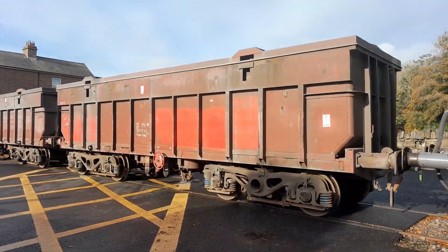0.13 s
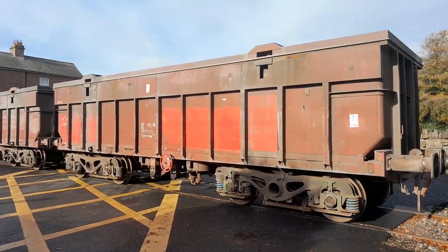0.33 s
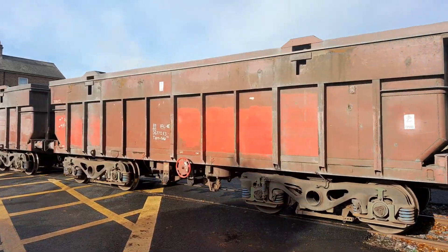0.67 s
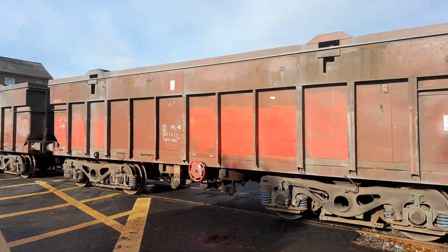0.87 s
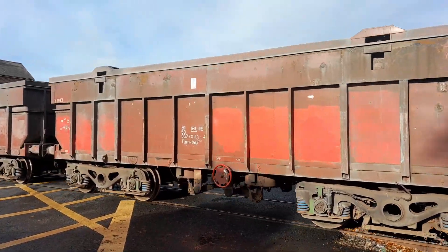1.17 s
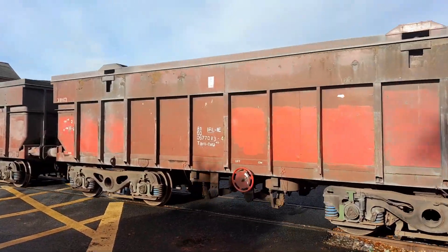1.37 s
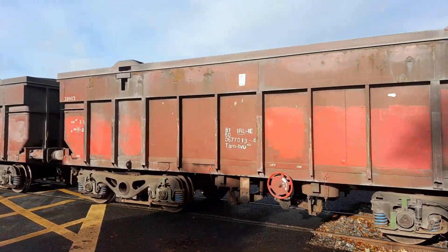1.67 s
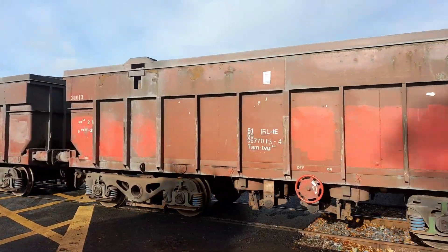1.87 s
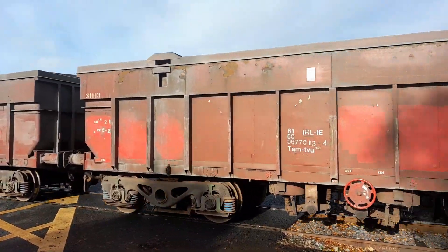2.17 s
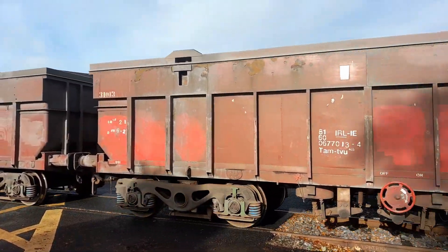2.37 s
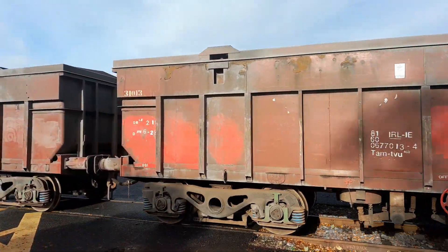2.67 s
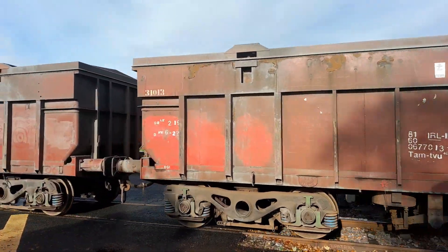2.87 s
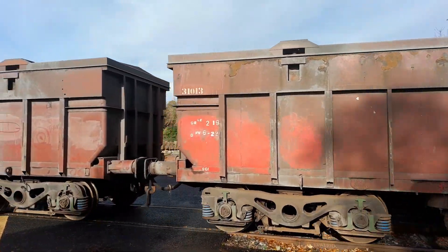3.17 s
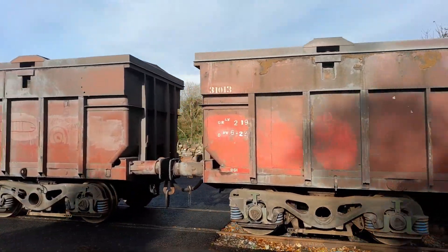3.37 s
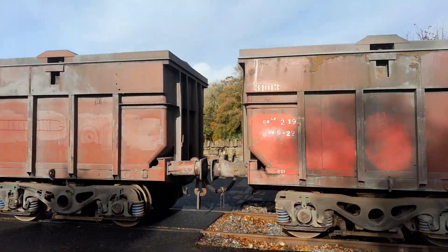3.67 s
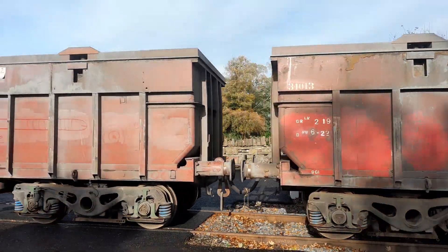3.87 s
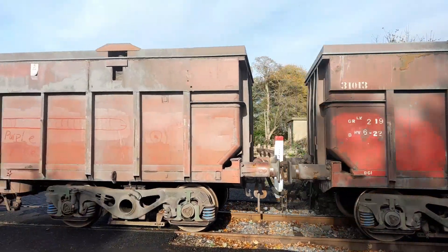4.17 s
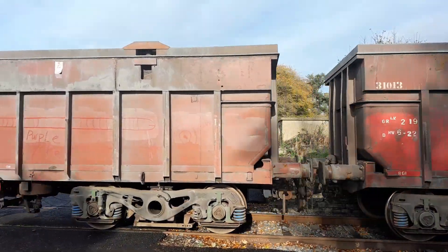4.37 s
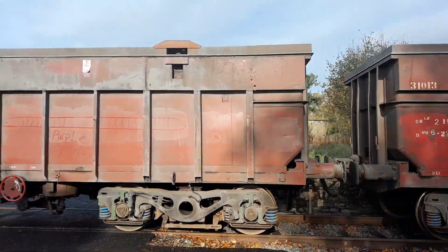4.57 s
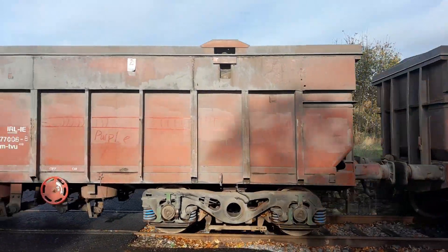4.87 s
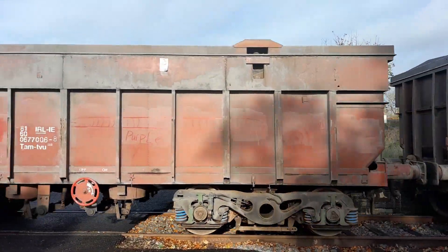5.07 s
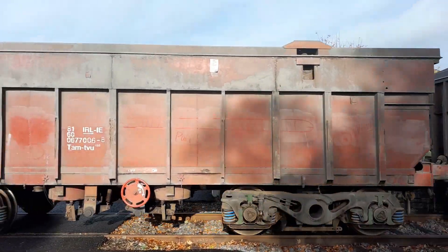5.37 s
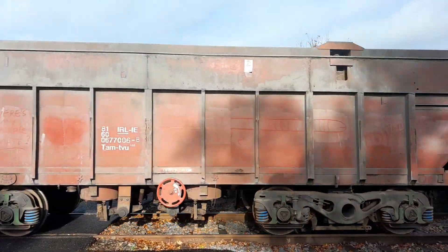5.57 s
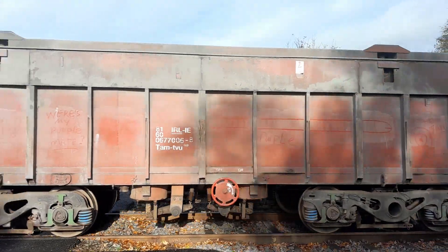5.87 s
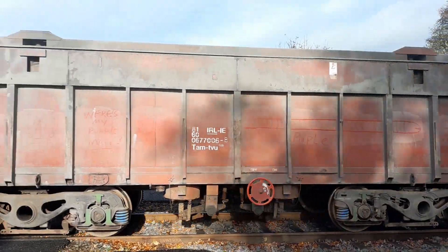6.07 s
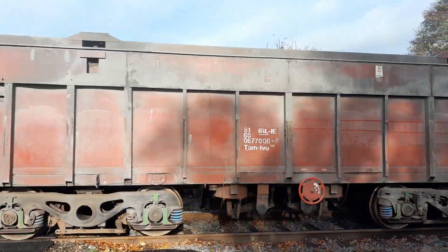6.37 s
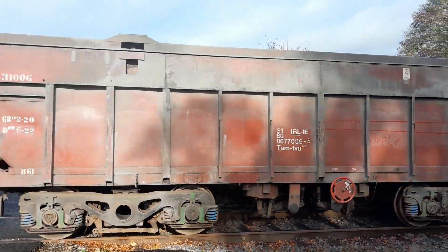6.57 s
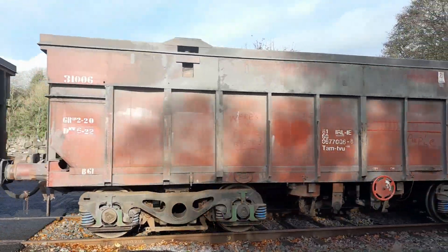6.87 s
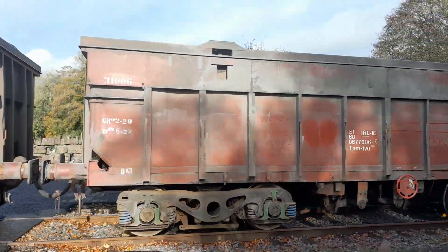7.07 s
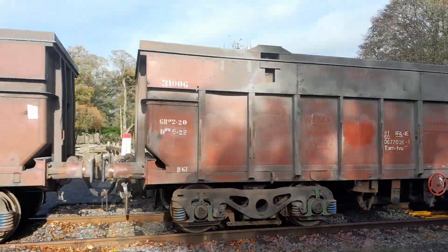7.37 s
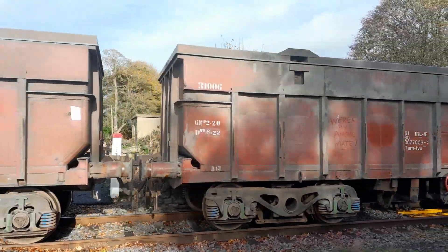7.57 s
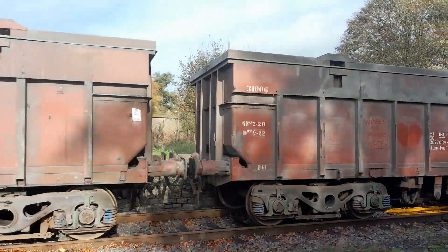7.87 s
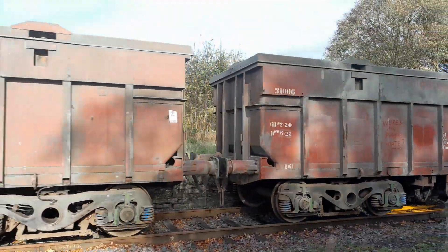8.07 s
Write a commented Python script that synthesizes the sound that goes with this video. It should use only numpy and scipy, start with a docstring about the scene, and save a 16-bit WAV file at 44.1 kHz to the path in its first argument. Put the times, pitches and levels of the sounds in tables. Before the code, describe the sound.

A loud diesel locomotive drones away to the right, easing off its revs, as freight wagons rumble past and wind buffets the microphone.

```python
"""Diesel locomotive easing off

Gusts flutter (gated low noise) and pop (single pressure swings) on two microphone ports. Wagons roll by as
coloured noise, with brake scrapes and flange squeaks. The locomotive recedes to the right: exhaust and gear
tones follow one crankshaft angle that falls and hunts, over casing roar, turbocharger whistle and intake rush."""
import sys
import numpy as np
from scipy.fft import rfft, irfft, next_fast_len
from scipy.io import wavfile
from scipy.ndimage import map_coordinates

SR = 44100
rng = np.random.default_rng(int(sys.argv[2]) if len(sys.argv) > 2 else 0)


def to_wav(s):
    """Save 16-bit WAV."""
    ch = np.atleast_2d(s).T  # columns
    pcm = np.round(np.clip(ch, -1, 1) * 32767)  # PCM
    wavfile.write(sys.argv[1], SR, pcm.astype(np.int16))


N = 362502


def amp(db):
    """Decibels to gain."""
    return 10 ** (np.asarray(db) / 20)


def unit(x):
    """Scale to rms 1 over all channels."""
    return x / np.sqrt(np.mean(np.abs(x) ** 2) + 1e-20)


def along(points, hz):
    """(frequency, value) points interpolated on a log axis."""
    point_hz, value = np.transpose(points)
    return np.interp(np.log(hz + 1), np.log(point_hz + 1), value)


def curves(rows):
    """One value per sample for each column after the time."""
    time_s, *columns = np.transpose(rows)
    return [np.interp(np.arange(N) / SR, time_s, column) for column in columns]


def wobble(knots_per_s):
    """Smooth random curve through normal knots."""
    knots = rng.standard_normal(int(N * knots_per_s / SR) + 4)
    return map_coordinates(knots, [np.arange(N) * knots_per_s / SR])


def port_wobbles(knots_per_s):
    """An independent random curve for each port."""
    return np.array([wobble(knots_per_s), wobble(knots_per_s)])


def filtered(x, response):
    """Apply a complex response of frequency."""
    size = next_fast_len(N + 8192)
    hz = np.fft.rfftfreq(size, 1 / SR)
    return irfft(rfft(x, size) * response(hz), size)[..., :N]


def noise(spectrum, channels=2):
    """Independent coloured noises, joint rms 1."""
    white = rng.standard_normal((channels, N))
    return unit(filtered(white, lambda hz: amp(along(spectrum, hz))))


def narrow(pitch_hz, width_hz):
    """Two independent narrow noises centred on a moving pitch."""
    white = rng.standard_normal((2, 2, N))
    in_phase, quadrature = filtered(white, lambda hz: 1 / (1 + (hz / width_hz) ** 2))
    phase = 2 * np.pi * np.cumsum(pitch_hz * np.ones(N)) / SR
    return unit(in_phase * np.cos(phase) + quadrature * np.sin(phase))


def sides(pan_db):
    """Left and right gains of mean power 1; positive pan is louder left."""
    return unit(amp([[pan_db / 2], [-pan_db / 2]]))


def stroke(start_s, length_s, edge_s=0.0096):
    """Smooth gate from start_s."""
    t = np.arange(N) / SR - start_s
    return (np.tanh(t / edge_s) - np.tanh((t - length_s) / edge_s)) / 2


# light wind: (time [s], relative level [dB])
BREEZE_LEVELS = [(0, -26), (1.6, -31), (2, -36), (3.5, -39.5), (4.3, -35), (6.5, -35.5), (6.8, -45.5),
                 (8.2, -47)]
# gusts on one port: (middle [s], full width at 1/e power [s], relative level [dB], port [0 left, 1 right])
GUST_EVENTS = [(.375, 0.066, -19.5, 0), (0.4, 0.045, -18, 1), (0.663, .08, -24, 1), (1.075, .16, -20, 0),
               (1.281, 0.078, -19, 1), (1.447, 0.22, -20, 1), (1.528, 0.11, -18, 0),
               (1.791, 0.13, -19.5, 1), (2.315, 0.12, -27.5, 1), (2.516, 0.051, -26.5, 1),
               (3.708, 0.026, -24, 1), (4.118, 0.25, -21, 1), (4.147, .15, -32, 0), (4.335, 0.082, -27, 0),
               (4.927, 0.054, -26.5, 0), (5.058, .2, -28.5, 1), (5.263, 0.05, -26.5, 0),
               (5.753, .08, -28.5, 1), (5.957, .07, -25.5, 0), (6.3, 0.11, -32.5, 0)]


def wind(drift_db=2.5):
    """Relative wind strength [dB] per port: drifting breeze plus bell-shaped gusts, added as power."""
    t = np.arange(N) / SR
    drift = np.array([wobble(9), wobble(8.3)])
    power = amp(curves(BREEZE_LEVELS)[0] + drift_db * drift) ** 2
    for middle_s, width_s, db, port in GUST_EVENTS:
        power[round(port)] += amp(db) ** 2 * np.exp(-(2 * (t - middle_s) / width_s) ** 2)
    return 10 * np.log10(power)


# turbulence spectra: (frequency [Hz], relative density [dB per Hz])
BUFFET_SPECTRUM = [(15, -12.5), (50, 1.5), (140, 6.5), (230, 7), (400, -4.5), (700, -16.5), (1200, -33),
                   (2500, -57.5)]
CRACKLE_SPECTRUM = [(200, -19.5), (500, 4.5), (900, -7), (1400, -13), (2200, -24), (4000, -45)]


def gusts(wind_db, buffet_db=-1, lumps_db=4, crackle_db=-14, strong_db=-25, steepness=1.44, spikes_db=5.0):
    """Turbulence on each port separately; crackle rises faster than buffet with flow."""
    lumps = unit(amp(lumps_db * port_wobbles(55)))
    flow = amp(wind_db - strong_db) * lumps
    spikes = unit(amp(spikes_db * port_wobbles(300)))
    buffet = amp(buffet_db) * flow * noise(BUFFET_SPECTRUM)
    crackle = amp(crackle_db) * flow ** steepness * spikes * noise(CRACKLE_SPECTRUM)
    return amp(strong_db) * (buffet + crackle)


EDDIES_PER_S, EDDY_HZ = 24, 460  # rate per port, central pitch


def eddies(wind_db, over_wind_db=-1.5, scatter_db=7, octaves=.7):
    """Lesser eddies at random times, levels following the wind on their port; rows as POP_EVENTS."""
    count = int(2 * EDDIES_PER_S * N / SR)
    rows = []
    for when, side, size, pitch in rng.random((count, 4)):
        port, at = round(side), int(when * N)
        db = wind_db[port, at] + over_wind_db + scatter_db * (2 * size - 1)
        hz = EDDY_HZ * 2 ** (octaves * (2 * pitch - 1))
        rows.append((at / SR, db, hz, port))
    return rows


def swing(u):
    """Antisymmetric suck and push of pressure."""
    return 3 * u / (1 + u * u) ** 2


# strongest eddies: (time [s], level before snap_db [dB], nominal pitch [Hz], port [0 left, 1 right])
POP_EVENTS = [(.159, -12, 560, 0), (.3427, -1.5, 690, 0), (.386, -9, 600, 0), (.6524, -16, 600, 1),
              (.6825, -12, 630, 1), (1.0311, -15.5, 500, 0), (1.0743, -19.5, 520, 0),
              (1.3373, -11, 1020, 1), (1.3872, -13, 920, 1), (1.4592, -12, 410, 1), (1.4788, -12, 785, 1),
              (1.6875, -16.5, 520, 0), (1.7772, -10, 577, 1), (1.818, -16.5, 400, 1), (2.521, -18, 460, 1),
              (3.7059, -19, 530, 1), (3.9614, -18, 418, 1), (4.031, -14.5, 530, 1), (4.0576, -12.5, 400, 1),
              (4.3227, -13, 420, 0), (4.3359, -6, 605, 0), (5.194, -19, 447, 1), (5.2533, -15, 523, 0),
              (5.289, -17, 480, 0), (5.7394, -16, 415, 1), (6.3397, -17, 580, 0)]


def pops(rows, snap_db=-0.5, wake_db=-9.5, wake_s=.007, slower=0.51, spread=0.69, count=5):
    """Each eddy gives one quick suck and push; weaker, mostly slower ones tumble in its wake."""
    lead = SR // 100
    since_s = np.arange(-lead, 4 * lead) / SR
    out = np.zeros((2, N + SR))
    draws = rng.standard_normal((len(rows), 3, count, 1))
    for (time_s, db, hz, port), (size, pitch, delay) in zip(rows, draws):
        snap = swing(np.pi * hz * since_s)
        wake_hz = slower * hz * np.exp(spread * pitch)
        wake = size * swing(np.pi * wake_hz * (since_s - wake_s * np.abs(delay)))
        at = round(time_s * SR)
        out[round(port), at:at + len(since_s)] += amp(db + snap_db) * (snap + amp(wake_db) * wake.sum(0))
    return out[:, lead:lead + N]


# wheel roar: (frequency [Hz], relative density [dB per Hz])
WHEEL_SPECTRUM = [(20, -1), (60, 9), (200, 6.5), (350, 1), (630, -2.5), (1000, -9), (1400, -12.5),
                  (2000, -16), (2800, -17.5), (4200, -20), (6000, -20.5), (8000, -24.5), (10000, -33.5),
                  (15500, -39)]
# (frequency [Hz], left-right correlation [-1 to 1])
WHEEL_CORRELATION = [(100, 1), (250, 1), (550, 0.48), (1100, -0.69), (2200, -0.14), (5000, -0.053)]
# (frequency [Hz], left-right level difference [dB])
WHEEL_BALANCE = [(100, -3), (500, 3.5), (1500, 4.5), (2400, 1), (4000, 0), (12000, 0.5)]
# (time [s], level before wobble [dB])
ROLLING_LEVELS = [(0, -37.5), (2.7, -40), (3.8, -44), (4.4, -40), (5.9, -39.5), (6.3, -37.5), (7.7, -38.5),
                  (8.2, -35)]


def rolling(sway_db=0.7, rattle_db=1):
    """Wheel-rail roar spread along the train: stereo noise of set correlation per frequency."""
    def mix(hz):
        turn = np.arccos(np.clip(along(WHEEL_CORRELATION, hz), -1, 1)) / 2
        return np.array([np.cos(turn), np.sin(turn)])

    def balance(hz):
        return amp(along(WHEEL_BALANCE, hz) * np.array([[.5], [-.5]]))

    mid, side = filtered(noise(WHEEL_SPECTRUM), mix)
    roll = unit(filtered(np.array([mid + side, mid - side]), balance))
    return roll * amp(curves(ROLLING_LEVELS)[0] + sway_db * wobble(6.7) + rattle_db * wobble(45))


# scrape noise: (frequency [Hz], relative density [dB per Hz])
GRIT_SPECTRUM = [(800, -21.5), (2000, -1), (4200, -2), (7500, -4.5), (10000, -8.5), (15500, -14.5)]
# (start [s], length [s], level before panning [dB])
SCRAPE_EVENTS = [(4.418, 0.13, -57.5), (6.158, .04, -49), (6.203, .06, -47.5), (6.281, .13, -48.5),
                 (6.49, .08, -50.5), (8.08, .12, -59)]


def scrapes():
    """A brake block scrapes a wheel: gated bright noise with a rough level."""
    roughness_db = 1.8 * wobble(110) + 1.3 * wobble(35)
    grit = unit(noise(GRIT_SPECTRUM) * amp(roughness_db))
    gates = sum(amp(db) * stroke(start_s, length_s) for start_s, length_s, db in SCRAPE_EVENTS)
    return gates * grit * sides(pan_db=3.0)


# flange rubs: (start [s], length [s], level before panning [dB], pitch [Hz])
SQUEAK_EVENTS = [(6.528, 0.085, -54, 1545), (8.1, 0.079, -56, 1800)]


def squeaks():
    """A flange rubs: short narrow-band noises."""
    out = np.zeros((2, N))
    for start_s, length_s, db, hz in SQUEAK_EVENTS:
        out += amp(db) * stroke(start_s, length_s) * narrow(hz, width_hz=110)
    return out * sides(pan_db=8)


# crankshaft rates [turns/s]
FULL_RATE, EASED_RATE, UNDERSHOOT = 9.452, 8.203, .391
EASE_FROM_S, EASE_TO_S = .756, 2.18
HUNT_PERIOD_S, HUNT_DECAY_S = 2.068, 2.55  # decay: time constant


def speed(delay_s=0):
    """Governed rate [turns/s]: steady, smooth fall with undershoot, then damped hunting."""
    t = np.arange(N) / SR - delay_s
    fall = np.clip((t - EASE_FROM_S) / (EASE_TO_S - EASE_FROM_S), 0, 1)
    since_s = np.maximum(t - EASE_TO_S, 0)
    hunt = np.exp(-since_s / HUNT_DECAY_S) * np.cos(2 * np.pi * since_s / HUNT_PERIOD_S)
    target = EASED_RATE - UNDERSHOOT * hunt
    return FULL_RATE + (target - FULL_RATE) * (1 - np.cos(np.pi * fall)) / 2


def crank():
    """Crankshaft angle [rad]: the integral of speed."""
    return 2 * np.pi * np.cumsum(speed()) / SR


def effort():
    """Acceleration [turns/s^2]: louder pulling up than running down."""
    return np.gradient(speed()) * SR


# (time [s], load [0-1])
LOAD_CURVE = [(0, 1), (1.1, 0.7), (1.5, .6), (1.9, 0.28), (8.2, 0.05)]


def engine_load():
    """Engine load over time."""
    return curves(LOAD_CURVE)[0]


START_M, TRAIN_M_PER_S = 3.68, 4  # initial distance, speed away


def receding_db():
    """Inverse-distance level relative to the start."""
    return -20 * np.log10(1 + TRAIN_M_PER_S * np.arange(N) / SR / START_M)


PORT_LAG_MS = .51  # left port behind right


def from_right(x, lag_ms):
    """Sound from the right reaches the left port later: the lag is split between ports."""
    return filtered(x, lambda hz: np.exp(np.array([[-1j], [1j]]) * np.pi * hz * lag_ms / 1000))


def down_the_line(pair, scatter, pan_db):
    """Direct locomotive sound plus an opposite-sign share scattered by the wagon sides."""
    scattered = scatter * np.array([[1], [-1]]) * pair[1]
    return from_right(pair[0] + scattered, PORT_LAG_MS) * sides(pan_db) / np.hypot(1, scatter)


WHISTLE_HZ, WHISTLE_HZ_PER_RATE, SPOOL_LAG_S = 6922, 795, .09  # pitch at EASED_RATE, slope, delay
# (time [s], level before skirt, octave and panning [dB])
WHISTLE_LEVELS = [(0, -44), (1.15, -45.5), (1.75, -54.5), (2.08, -57), (2.23, -48), (3.25, -51.5),
                  (3.65, -55), (4.6, -53), (8.2, -50.5)]


def whistle(octave_db=-21, skirt_db=-2):
    """Breathy turbocharger tone and octave, lagging engine speed and broadening under load."""
    pitch_hz = WHISTLE_HZ + WHISTLE_HZ_PER_RATE * (speed(SPOOL_LAG_S) - EASED_RATE)
    tone = narrow(pitch_hz, width_hz=103)
    tone += amp(skirt_db) * engine_load() * narrow(pitch_hz, width_hz=410)
    tone += amp(octave_db) * narrow(2 * pitch_hz, width_hz=330)
    return down_the_line(amp(curves(WHISTLE_LEVELS)[0]) * tone, scatter=1.0, pan_db=-5.0)


# air rush: (frequency [Hz], relative density [dB per Hz])
INTAKE_SPECTRUM = [(1500, -25), (3700, 0.5), (5000, -3.5), (6000, 0.5), (8200, -5.5), (9500, -14),
                   (12500, -10), (15500, -12.5)]
# (start [s], length [s], level before surge_db [dB])
SURGE_EVENTS = [(0.682, .26, -63), (1.14, .1, -65), (2.169, .08, -65.5), (2.304, 1.02, -66.5),
                (2.563, 0.1, -66.5), (4.38, 0.23, -72.5)]


def intake(rush_db=-45, rush_fade=1.25, effort_db=0.8, surge_db=13, surge_edge=.16):
    """Air rush through the intakes; steady draw and surges add as power."""
    draw = amp(rush_db + rush_fade * receding_db() + effort_db * effort())
    surges = np.zeros(N)
    for start_s, length_s, db in SURGE_EVENTS:
        surges += amp(db + surge_db) * stroke(start_s, length_s, edge_s=surge_edge * length_s)
    rush = np.hypot(draw, surges) * noise(INTAKE_SPECTRUM)
    return down_the_line(rush, scatter=.38, pan_db=-8.5)


def machinery_gain(near_db=-30, effort_db=1):
    """Gain shared by casing and gears: distance and effort."""
    return amp(near_db + receding_db() + effort_db * effort())


# (frequency [Hz], relative density [dB per Hz])
CASING_SPECTRUM = [(60, -26), (200, 6.5), (400, 3), (680, 0.5), (1000, -12.5), (1450, -11), (2100, -12),
                   (2900, -18), (4000, -21), (6000, -31.5), (12000, -50.5)]


def casing(angle, pulsing=.2):
    """Engine casing roar, pulsing with twelve firings a turn."""
    firing = np.cos(12 * angle)
    roar = noise(CASING_SPECTRUM) * (1 + pulsing * firing)
    return machinery_gain() * down_the_line(roar, scatter=0.35, pan_db=3.0)


# wagons hiding the locomotive: (time [s], share [0-1])
SCREEN_SHARE = [(0, 0), (3.1, 0.08), (3.7, 0.78), (8.2, 1)]
# gear and blower tones: (multiple of crankshaft rate, rounded when played, relative level loaded [dB],
# relative level eased off [dB], phase wander scale [rad])
GEAR_TONES = [(73.04, -18, -4, .45), (78.74, -10, -7, .7), (159.3, -15, -22, 0.8), (237, -27.5, -22, 0.87),
              (397, -21, -17.5, 1.2), (602, -24, -18, 1.5)]
SWELL_S, SWELL_LENGTH_S, SWELL_DB = 3.05, 0.39, 4.5  # brief swell of all tones


def gears(angle, waver_db=3.2, screen_db_per_order=0.07, bend_db=7.0):
    """Gear and blower tones locked to the crank, with a wavering path to each port."""
    load = engine_load()
    hidden, = curves(SCREEN_SHARE)
    whine = np.zeros((2, N))
    for order, loaded_db, eased_db, wander_rad in GEAR_TONES:
        phase = round(order) * angle + wander_rad * (wobble(22) + .5 * port_wobbles(15))
        # low tones bend round the wagons, high ones do not: a tilt about order 100
        shadow_db = hidden * (bend_db - screen_db_per_order * order)
        tone_db = eased_db + load * (loaded_db - eased_db) + shadow_db + waver_db * wobble(11)
        whine += np.sqrt(2) * amp(tone_db) * np.sin(phase)
    swell = amp(SWELL_DB * stroke(SWELL_S, SWELL_LENGTH_S, edge_s=.06))
    return machinery_gain() * swell * from_right(whine, lag_ms=0.453)


# gas rumble: (frequency [Hz], relative density [dB per Hz])
EXHAUST_SPECTRUM = [(15, -35), (30, -27), (50, -9.5), (75, -1), (115, 1), (160, -12.5), (300, -25),
                    (700, -63.5)]


def exhaust_gas(loaded_db=-28, eased_db=-35):
    """Soft rumble of exhaust gas, its level following load."""
    level_db = eased_db + engine_load() * (loaded_db - eased_db)
    return amp(level_db) * down_the_line(noise(EXHAUST_SPECTRUM), scatter=0.47, pan_db=-1)


# strongest orders, swelling across resonances; levels before waver and panning:
# (time [s], order 9 level [dB], order 14 level [dB])
STRONG_ORDERS = [(0, -15, -42), (1.08, -13, -44), (1.3, -23.5, -45), (1.65, -21.5, -45),
                 (1.9, -19.5, -32.5), (2.6, -11.5, -24), (3.25, -18.5, -30), (3.8, -19, -27.5),
                 (4.15, -22, -20), (4.5, -16.5, -22.5), (5.7, -18, -22.5), (8.22, -21, -23)]
# weaker orders from unequal cylinders; levels before waver and panning:
# (multiple of crankshaft rate, level loaded [dB], level eased off [dB])
WEAK_ORDERS = [(6, -25.5, -42), (7, -23.5, -40.5), (8, -24.5, -32), (10, -21.5, -35), (11, -33.5, -32.5),
               (12, -30, -35), (13, -27.5, -32), (15, -40, -40), (16, -41, -35.5), (17, -45.5, -45.5),
               (18, -47.5, -44), (19, -47.5, -49.5), (20, -47.5, -48.5)]


def exhaust_boom(angle, waver_db=0.5, side_waver_db=1, smear_rad=0.903):
    """Two strong crankshaft orders; adjacent orders beat against them once a turn."""
    def line(order, db):
        # silencer delays each order differently, spreading the beat over the turn
        phase = order * angle + smear_rad * (order - 9) ** 2 + rng.normal(0, .3)
        return np.sqrt(2) * amp(db) * np.sin(phase)

    ninth_db, fourteenth_db = curves(STRONG_ORDERS)
    load = engine_load()
    boom = line(9, ninth_db + waver_db * wobble(10))
    boom += line(14, fourteenth_db + waver_db * wobble(8.1))
    for order, loaded_db, eased_db in WEAK_ORDERS:
        boom += line(round(order), eased_db + load * (loaded_db - eased_db) + side_waver_db * wobble(4.4))
    return from_right(boom, PORT_LAG_MS) * sides(pan_db=1.3)


def scene():
    """Sum of wind, wagons and locomotive."""
    wind_db, angle = wind(), crank()
    air = gusts(wind_db) + pops(eddies(wind_db)) + pops(POP_EVENTS)
    wagons = rolling() + scrapes() + squeaks()
    locomotive = whistle() + intake() + casing(angle) + gears(angle) + exhaust_gas() + exhaust_boom(angle)
    return air + wagons + locomotive


TOP_HZ = 15750


def record(dry):
    """Round off the tallest peaks, then cut everything from TOP_HZ up."""
    rounded = dry / (1 + np.abs(dry / .88) ** 10) ** .1
    return filtered(rounded, lambda hz: hz < TOP_HZ)


dry = scene()
out = record(dry)
to_wav(out)
```